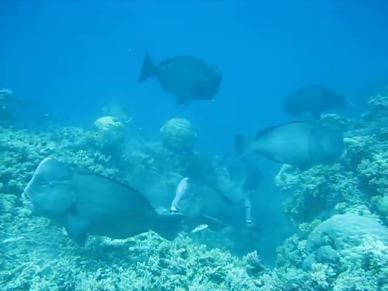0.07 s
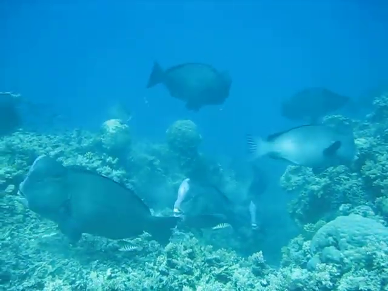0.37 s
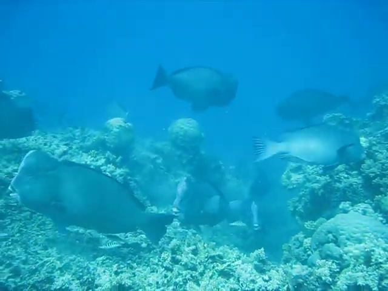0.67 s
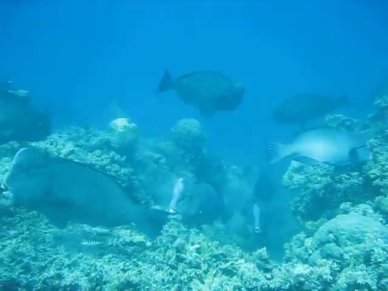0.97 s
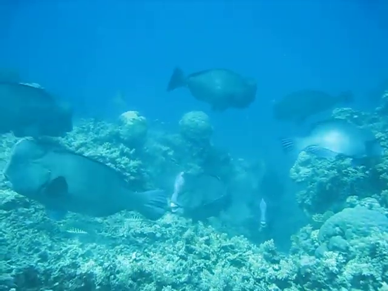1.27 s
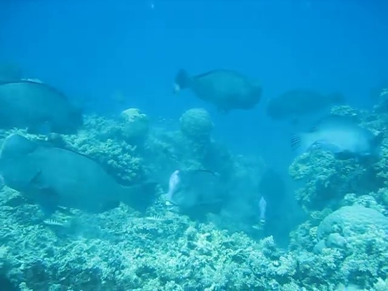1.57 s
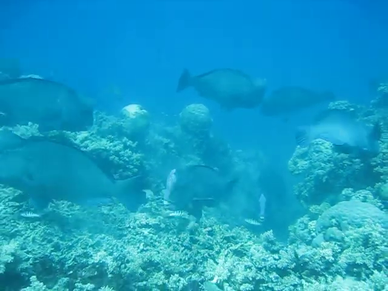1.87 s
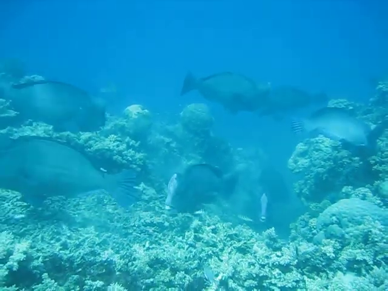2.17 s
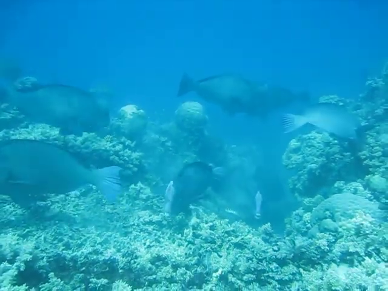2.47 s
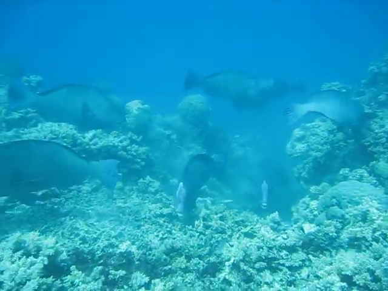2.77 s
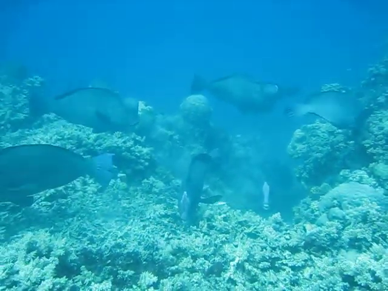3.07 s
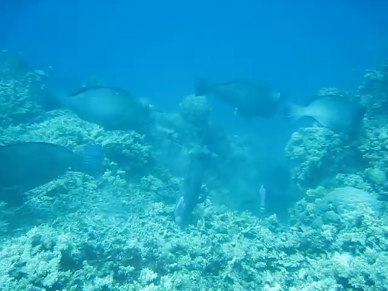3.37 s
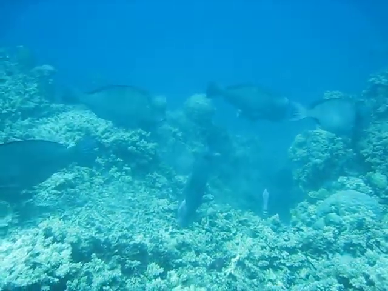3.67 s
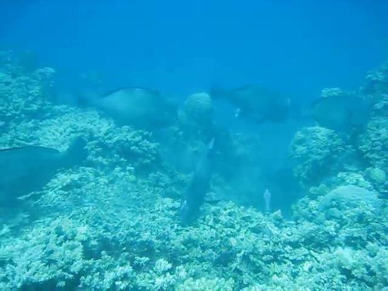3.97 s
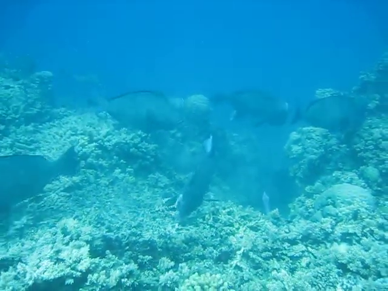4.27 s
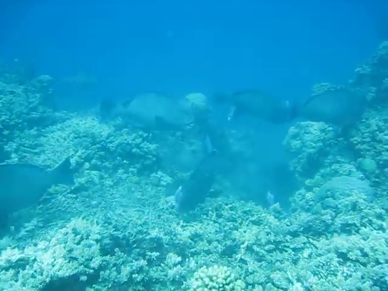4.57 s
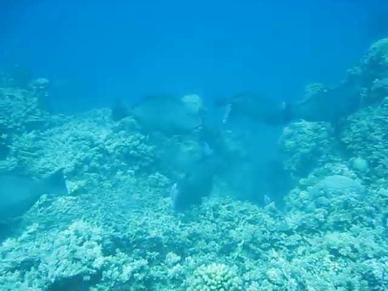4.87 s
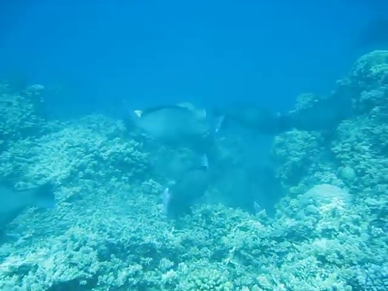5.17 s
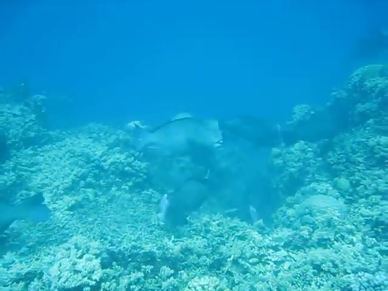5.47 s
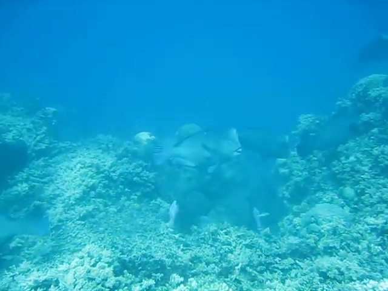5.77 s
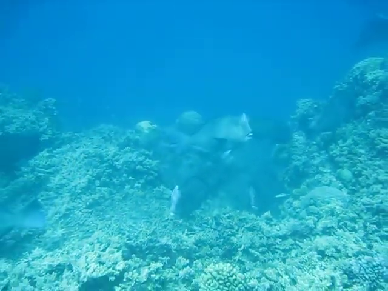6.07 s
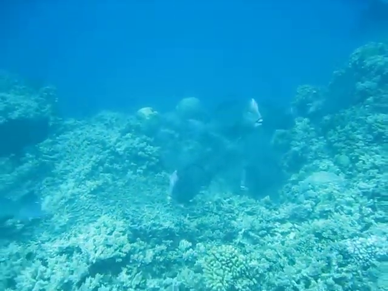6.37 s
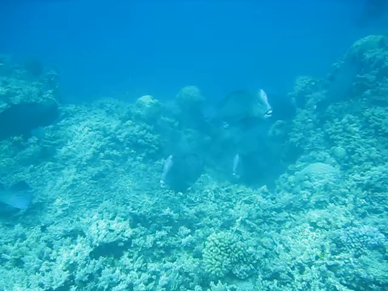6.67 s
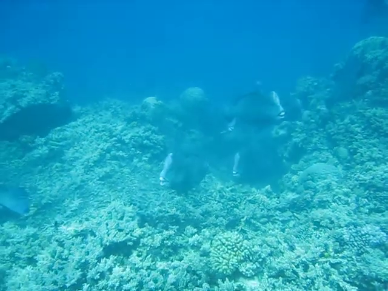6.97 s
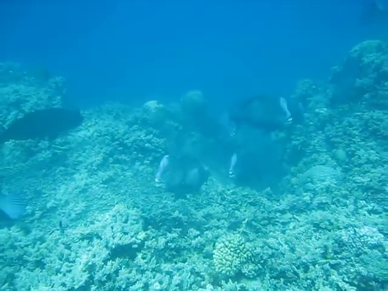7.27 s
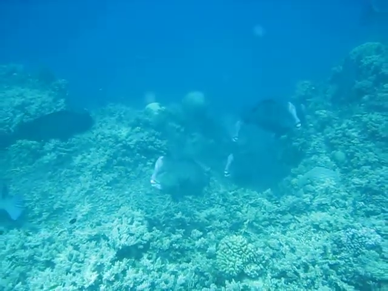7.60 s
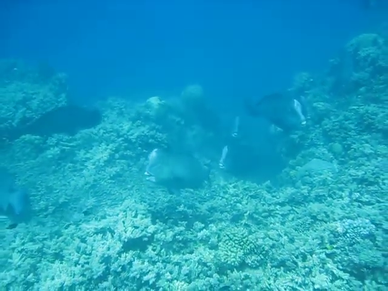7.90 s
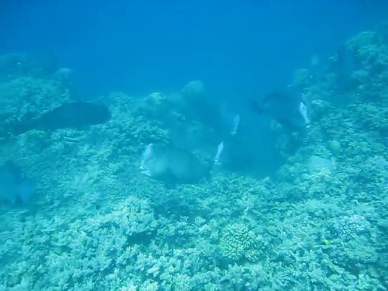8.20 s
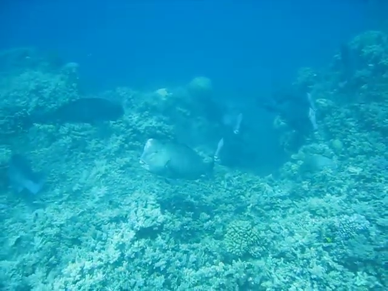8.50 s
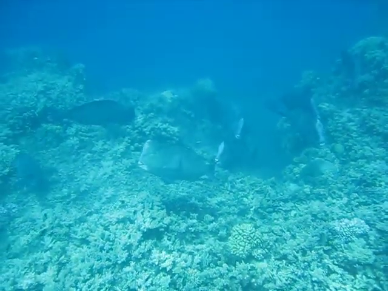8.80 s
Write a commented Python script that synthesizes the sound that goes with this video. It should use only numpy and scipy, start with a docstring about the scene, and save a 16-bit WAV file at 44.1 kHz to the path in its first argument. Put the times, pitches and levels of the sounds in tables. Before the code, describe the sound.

A shallow reef crackles and clicks with shrimp and grazing fish, over a steady watery hum broken by hollow bumps.

```python
"""Parrotfish grazing a reef

Big parrotfish rasp and crack the coral with their beaks while shrimp snap all around, with a
few hollow plops. We listen from inside an underwater camera housing that rings near 530 Hz:
the restless water keeps it humming, and every knock makes it ring out over a low rumble."""
import sys
import numpy as np
from scipy import signal
from scipy.io import wavfile

SR = 44100
rng = np.random.default_rng(int(sys.argv[2]) if len(sys.argv) > 2 else 0)


def store_wav(level_fs):
    """Save 16-bit WAV to argv[1]."""
    pcm = np.round(np.clip(np.atleast_2d(level_fs), -1, 1) * 32767)
    wavfile.write(sys.argv[1], SR, pcm.T.astype(np.int16))


N = 389844

# Beak strokes over coral. Each row: start, attack and length in seconds, force in dB.
BEAK_STROKES = [(1.406, 0.0096, .035, -45), (1.447, .004, 0.016, -38.5), (1.495, 0.0063, 0.038, -47.5),
                (1.553, .007, 0.041, -40), (3.47, 0.023, .068, -45.5), (4.718, 0.051, 0.11, -41),
                (4.828, 0.0053, 0.088, -39.5), (4.947, 0.0031, 0.045, -37.5), (4.986, 0.013, 0.032, -42),
                (5.85, 0.029, 0.036, -45)]
# Each piece of coral has its own voice. Each row: start in seconds, lowest mode in Hz,
# then grit and housing shake in dB against the coral's ring.
CORAL_PIECES = [(1, 1387, -11.5, -1), (3, 1070, -0.5, -7), (4.2, 1832, -4, -5.5), (5.5, 950, -26, 1)]
# The ring of scraped coral. Each row: multiple of the lowest mode, bandwidth in Hz, level in dB.
CORAL_MODES = [(1, 44, 0), (1.085, 58, 0), (1.275, 55, -5), (1.347, 28, -9)]
# The gritty edge of a stroke. Each row: frequency in Hz, gain in dB.
GRIT_EQ = [(400, -13), (900, -17), (1600, 3.5), (1950, 12.5), (2900, -9), (3500, 7.5), (4500, 3), (5000, 5),
           (5400, -17), (6050, -5), (7000, 3), (7900, -17), (10000, -8.5), (16000, -28)]
# Coral giving way. Each row: start in seconds, relative level in dB, pitch in Hz.
CORAL_CRACKS = [(1.4042, -29, 3850), (1.457, -25, 4300), (1.503, -29, 1500), (1.561, -26.5, 4060),
                (1.6622, -27, 2940), (2.702, -34, 4600), (3.305, -32, 1790), (3.505, -28, 2800),
                (3.5157, -25.5, 2170), (3.86, -32.5, 1400), (4.407, -32.5, 2440), (4.9497, -24, 2030),
                (5.144, -24, 2670), (5.638, -31, 4200), (5.694, -35, 4200), (6.3, -24.5, 2580),
                (6.535, -30, 3480), (6.5399, -22, 1360), (6.766, -30.5, 5400), (7.521, -31.5, 1410),
                (8.179, -28, 1690)]
# Close shrimp. Each row: start in seconds, relative level in dB, pitch in Hz.
SHRIMP_SNAPS = [(.231, -35, 5800), (0.726, -21.5, 7100), (1.03, -35.5, 5170), (1.77, -29.5, 9000),
                (1.878, -30.5, 7200), (2.198, -26.5, 7340), (2.832, -36, 9000), (3.3885, -25, 4570),
                (3.3943, -27, 4360), (3.466, -23.5, 5240), (3.829, -28.5, 8150), (4.6343, -27.5, 3800),
                (4.884, -30, 4300), (5.1163, -25.5, 6560), (5.1633, -32, 6760), (5.169, -29.5, 7000),
                (5.5324, -29.5, 10800), (6.5178, -34, 10000), (6.5397, -23, 13200), (7.362, -31.5, 5950),
                (7.4568, -30, 7200), (7.652, -29.5, 4260), (7.9881, -31.5, 8900)]
# A click's tone. Each row: multiple of its pitch, gain in dB at full focus.
CLICK_EQ = [(.25, -10), (.75, -4), (1, 9), (1.3, -2), (4, -9.5)]
# The colour the housing wall gives a click. Each row: frequency in Hz, gain in dB.
WALL_EQ = [(400, -15.5), (1200, 0), (1950, 3.5), (2400, -1.5), (3500, 3.5), (3900, 0), (4450, 4),
           (5300, -5.5), (6200, 2.5), (7000, -1.5), (8100, -5), (10300, -3.5), (12800, -5.5), (14400, 1),
           (16000, -18)]
# Hard knocks that shove the housing. Each row: start in seconds, then ring, thud and clack in dB.
HOUSING_KNOCKS = [(1.274, -46, -38, -61), (1.502, -33.5, -37, -39), (2.199, -21.5, -33.5, -61),
                  (3.305, -34.5, -55, -39), (3.728, -35, -38, -49), (3.83, -26, -34, -56),
                  (4.189, -43, -35.5, -58), (4.766, -25, -36, -42), (5.008, -31.5, -39, -59),
                  (6.365, -43, -40, -58), (6.428, -31.5, -35, -32.5), (6.5388, -21.5, -65, -19.5),
                  (6.676, -32, -35, -28.5), (6.876, -39, -36, -40), (8.237, -42, -37, -38),
                  (8.398, -9, -11, -5.5), (8.565, -42, -30, -63)]
# The housing's ring. Each row: frequency in Hz, level in dB, seconds to fall by 60 dB.
HOUSING_MODES = [(536.2, -1, 0.068), (577, -7.5, 0.022), (421, -37, 0.039), (781, -15, 0.034),
                 (978, -26, 0.043), (1286, -32, 0.036)]
# A knock's low thud, hard clack and trailing rumble. Each row: frequency in Hz, gain in dB.
THUD_EQ = [(20, -19), (90, -0.5), (280, 0.5), (450, -1.5), (800, -19.5), (2000, -28), (8000, -77)]
CLACK_EQ = [(100, -28.5), (450, 19), (750, 13), (1050, 9.5), (1300, 11), (1650, 7), (2050, 10), (2500, -23),
            (3100, -7), (5000, -17), (8000, -41), (16000, -75)]
WALLOW_EQ = [(20, 0), (60, 2), (150, -9), (400, -30), (2000, -80)]
# Soft bumps on the housing. Each row: start in seconds, level in dB.
SOFT_BUMPS = [(.129, -35), (.639, -36), (.658, -31), (1.066, -31), (1.568, -33), (2.096, -31), (2.111, -30),
              (2.161, -29.5), (2.319, -26), (2.504, -27), (2.727, -30.5), (2.881, -31.5), (3.011, -30.5),
              (3.493, -22.5), (3.69, -34), (3.861, -25), (4.292, -38), (4.777, -29), (5.883, -31),
              (6.474, -27.5), (6.819, -28), (7.522, -28), (8.291, -32.5), (8.447, -35), (8.787, -15),
              (8.818, -32)]
# Hollow plops in the water. Each row: start in seconds, level in dB, pitch in Hz.
WATER_PLOPS = [(1.429, -35, 422), (1.457, -35, 400), (3.379, -37, 350), (4.772, -31, 423),
               (6.365, -28.5, 263), (6.614, -43.5, 268), (6.6908, -23.5, 686), (6.692, -35.5, 119)]
# The steady wash of the water. Each row: frequency in Hz, gain in dB.
WASH_EQ = [(20, -16), (50, -4.5), (130, -1.5), (330, 0), (480, 3.5), (640, -1), (1000, -3.5), (1900, -6.5),
           (2700, -10.5), (4400, -12), (5300, -14), (6500, -14.5), (8200, -15), (12800, -21), (14400, -25),
           (16000, -26)]
# Camera electronics. Each row: frequency in Hz, level in dB.
WHINE_TONES = [(7852, -93), (15734, -86)]

SNAP_FOCUS, SNAP_DECAY_S = 0.75, 0.0014  # focus: how far a click's own pitch stands out


def beak_scrapes(slips_per_s=2600, size=4096):
    """A beak slips over coral in a run of tiny fractures that ring it and shake the housing."""
    out, t = np.zeros(N), np.arange(size) / SR
    grit, housing = impulse(GRIT_EQ), housing_ring()
    for start, attack_s, length_s, force_db in BEAK_STROKES:
        hz, grit_db, shake_db = [voice for since, *voice in CORAL_PIECES if since <= start][-1]
        force = beak_force(attack_s, length_s)
        slips = force * grains(SR, slips_per_s, spread_db=2, top_db=12)[:len(force)]
        coral = sum(amp(db) * np.exp(-np.pi * width * t) * np.cos(2 * np.pi * hz * multiple * t)
                    for multiple, width, db in CORAL_MODES)
        low_cut = impulse([(0.81 * hz, -12), (1.03 * hz, 0)])  # little radiates below the lowest mode
        coral = through(coral, low_cut)
        for db, response in [(grit_db, grit), (0, coral), (shake_db, housing)]:
            layer = unit_energy(signal.fftconvolve(slips, response))
            add(out, start, amp(force_db + db) * np.linalg.norm(force) * layer)
    return out


def beak_force(attack_s, length_s, release_s=0.0029, sag_db=-9.5, judder_db=2.5, judder_per_s=147):
    """The beak presses in, catches unevenly and weakens as it slides, then lets go."""
    t = np.arange(round(length_s * SR)) / SR
    catches = rng.standard_normal(256)
    judder = np.interp(t * judder_per_s, np.arange(len(catches)), catches)
    slide = np.maximum(t - attack_s, 0) / length_s
    envelope = np.minimum(t / attack_s, 1) * np.minimum((length_s - t) / release_s, 1)
    return envelope * amp(sag_db * slide + judder_db * judder)


def coral_cracks(gain_db=12):
    """Coral gives way in a beak with a woody crack, duller and longer than a shrimp's snap."""
    out = np.zeros(N)
    for start, db, hz in CORAL_CRACKS:
        add(out, start, amp(db + gain_db) * click(hz, focus=0.73, sparkle_db=-10, decay_s=0.0022))
    return out


def close_shrimp(gain_db=12):
    """Shrimp in the foreground snap short and bright."""
    out = np.zeros(N)
    for start, db, hz in SHRIMP_SNAPS:
        add(out, start, amp(db + gain_db) * click(hz, SNAP_FOCUS, sparkle_db=-2, decay_s=SNAP_DECAY_S))
    return out


def click(hz, focus, sparkle_db, decay_s):
    """One sharp, pitched break heard through the housing wall; sparkle is a shelf above 8 kHz."""
    body = impulse([(hz * multiple, focus * db) for multiple, db in CLICK_EQ])
    shelf = impulse([(7100, 0), (8300, sparkle_db)])
    colour = through(through(body, impulse(WALL_EQ)), shelf)
    return through(scatter(decay_s), unit_energy(colour))


def scatter(decay_s=0.0014, attack_s=0.00024, tail_db=-24, tail_s=0.015, size=1024):
    """Many short paths smear a click, with a faint tail off the reef."""
    t = np.arange(size) / SR
    burst = (1 - np.exp(-t / attack_s)) * np.exp(-t / decay_s)
    tail = amp(tail_db) * np.exp(-t / tail_s)
    return unit_energy((burst + tail) * rng.choice([-1, 1], size) * rng.uniform(0, 1, size))


def knocks(swell_s=0.0023, thud_lead_s=0.00071, size=4096):
    """A blow thuds, clacks and rings the housing; the weaker the clack, the softer the ring's attack."""
    out, t = np.zeros(N), np.arange(size) / SR
    ring, thud, clack = housing_ring(), impulse(THUD_EQ), impulse(CLACK_EQ)
    for start, ring_db, thud_db, clack_db in HOUSING_KNOCKS:
        softness = 1 / (1 + amp(clack_db - ring_db + 8.5) ** 2)
        swell = 1 - np.exp(-t / (swell_s * softness))
        add(out, start - thud_lead_s, amp(thud_db) * thud)
        add(out, start, amp(ring_db) * swell * ring + amp(clack_db) * clack)
    return out


def bumps(swell_s=0.0021, faint_per_s=4, faint_db=-42, size=4096):
    """Soft bumps swell into the housing's ring, with fainter ones dotted about at random."""
    t = np.arange(size) / SR
    ring = (1 - np.exp(-t / swell_s)) * housing_ring()
    out = amp(faint_db) * through(grains(N, faint_per_s, spread_db=1.5, top_db=10), ring)
    for start, db in SOFT_BUMPS:
        add(out, start, amp(db) * ring)
    return out


def housing_ring(size=4096):
    """One tap on the housing: a handful of fast-dying modes."""
    t = np.arange(size) / SR
    return sum(amp(db - 60 * t / t60) * np.sin(2 * np.pi * hz * t) for hz, db, t60 in HOUSING_MODES)


def plops(cycles_to_peak=0.53, size=4096):
    """Hollow plops swell and die within a few cycles, so the low ones last longer."""
    out, t = np.zeros(N), np.arange(size) / SR
    for start, db, hz in WATER_PLOPS:
        age = t * hz / cycles_to_peak
        add(out, start, amp(db) * age * np.exp(1 - age) * np.sin(2 * np.pi * hz * t))
    return out


def wallow(below_thud_db=45, fade_db_per_s=30):
    """The water wallows after each shove: a low rumble that dies away."""
    envelope, t = np.zeros(N), np.arange(SR) / SR
    for start, _, thud_db, _ in HOUSING_KNOCKS:
        add(envelope, start, amp(thud_db - below_thud_db - fade_db_per_s * t))
    return envelope * noise(WALLOW_EQ)


def midground_shrimp(top_db=-24, range_db=6, low_hz=3600, high_hz=10000, count=28):
    """Shrimp a little further off tick at random times and pitches."""
    out = np.zeros(N)
    for when, distance, pitch in rng.random((count, 3)):
        hz = low_hz * (high_hz / low_hz) ** pitch
        tick = click(hz, SNAP_FOCUS, sparkle_db=-5, decay_s=SNAP_DECAY_S)
        add(out, when * N / SR, amp(top_db - range_db * distance) * tick)
    return out


def reef_crackle(level_db=-58, per_s=380, peak_db=9, spots=32):
    """Far shrimp and nibbling fish crackle from many spots, each with its own paths and pitch."""
    out = np.zeros(N)
    for hz in np.geomspace(1700, 12500, spots):
        spot = through(scatter(), impulse([(0.97 * hz, 0), (hz, peak_db), (1.3 * hz, 0)]))
        out += through(grains(N, per_s / spots, spread_db=2, top_db=15), unit_rms(spot))
    return amp(level_db) * unit_rms(through(out, impulse(WALL_EQ)))


def water_bed(wash_db=-52.5, hum_db=-52.5):
    """A soft wash, and countless small nudges that keep the housing humming."""
    wash = noise(WASH_EQ)
    nudges = grains(N, per_s=130, spread_db=-0.5, top_db=6)
    hum = unit_rms(through(nudges, housing_ring()))
    return amp(wash_db) * wash + amp(hum_db) * hum


def camera_whine():
    """The electronics hold faint, steady high tones."""
    t = np.arange(N) / SR
    return sum(amp(db) * unit_rms(np.sin(2 * np.pi * hz * t)) for hz, db in WHINE_TONES)


def grains(samples, per_s, spread_db, top_db):
    """Randomly timed clicks of either sign and uneven level, capped at top_db."""
    level_db = np.minimum(spread_db * rng.exponential(1, samples), top_db)
    fires = rng.random(samples) < per_s / SR
    return fires * rng.choice([-1, 1], samples) * amp(level_db)


def noise(eq):
    """Steady noise shaped by an EQ curve, at rms 1."""
    return unit_rms(through(rng.standard_normal(N), impulse(eq)))


def impulse(eq, size=4096):
    """The tightest causal pulse with this EQ curve (minimum phase), at peak 1."""
    hz, db = np.transpose(eq)
    bin_hz = abs(np.fft.fftfreq(size, 1 / SR))
    log_gain = np.log(amp(np.interp(np.log(bin_hz + 1), np.log(hz + 1), db)))
    spectrum = np.exp(np.conj(signal.hilbert(log_gain)))
    pulse = np.fft.ifft(spectrum).real
    return pulse / abs(pulse).max()


def through(x, response):
    """Plays x through an impulse response."""
    return signal.fftconvolve(x, response)[:len(x)]


def add(mix, start_s, sound):
    """Drops a sound into the mix."""
    part = mix[round(start_s * SR):][:len(sound)]
    part += sound[:len(part)]


def amp(db):
    """Decibels to gain."""
    return 10 ** (np.asarray(db) / 20)


def unit_rms(x):
    """Scales to rms 1."""
    return x / np.sqrt(np.mean(x ** 2) + 1e-20)


def unit_energy(x):
    """Scales to a total energy of 1."""
    return x / np.linalg.norm(x)


def scene():
    """The mono mix at the microphone, built from the bed up."""
    bed = water_bed() + reef_crackle() + midground_shrimp()
    feeding_and_snaps = beak_scrapes() + close_shrimp() + coral_cracks()
    jostling = bumps() + knocks() + wallow()
    return (bed + feeding_and_snaps + jostling + plops() + camera_whine())[None]


def record(dry, ceiling=0.72, cutoff_hz=16150):
    """The hardest knock just overloads the microphone; the camera then cuts the top end."""
    soft_clipped = dry / (1 + (dry / ceiling) ** 6) ** (1 / 6)
    lowpass = signal.firwin(301, cutoff_hz, window=("kaiser", 8), fs=SR)
    return signal.oaconvolve(soft_clipped, lowpass[None], "same")


dry = scene()
out = record(dry)
store_wav(out)
```